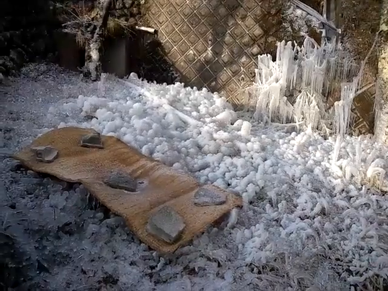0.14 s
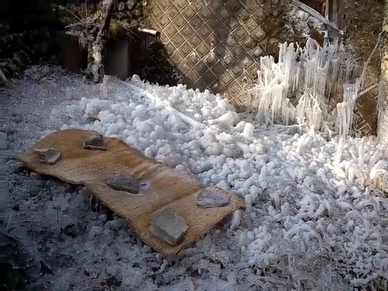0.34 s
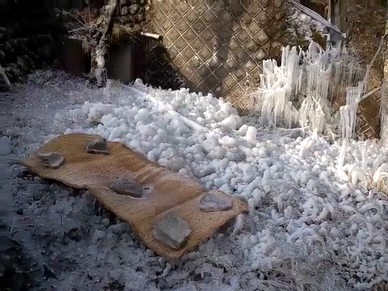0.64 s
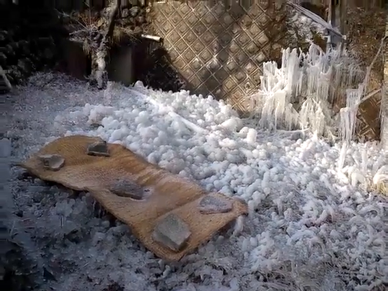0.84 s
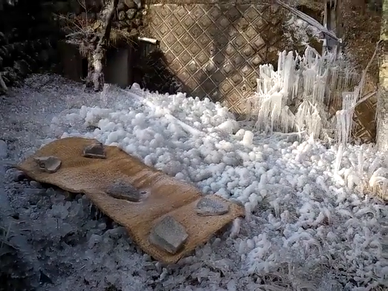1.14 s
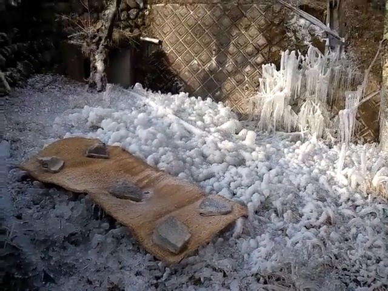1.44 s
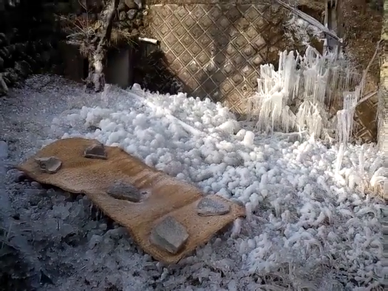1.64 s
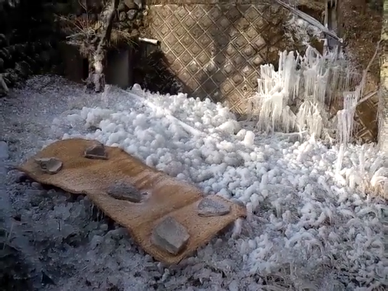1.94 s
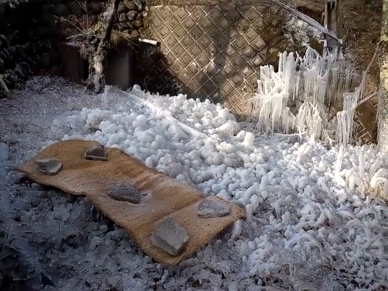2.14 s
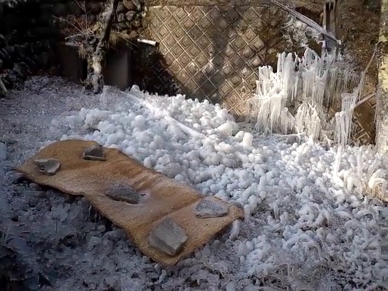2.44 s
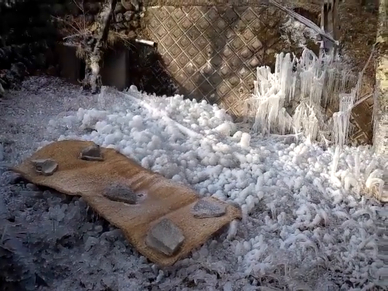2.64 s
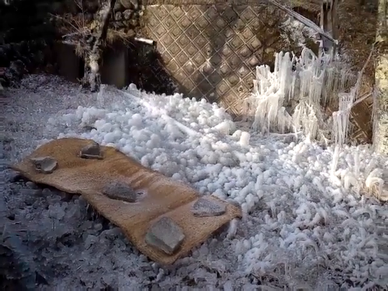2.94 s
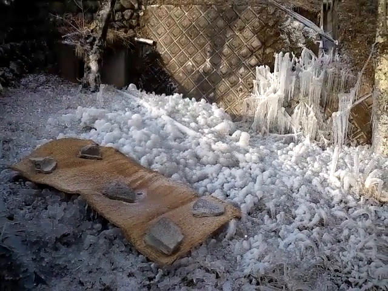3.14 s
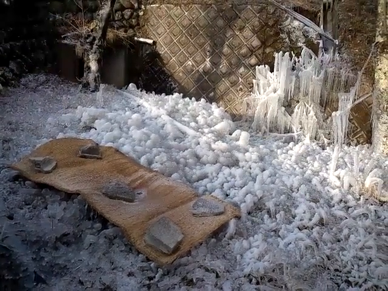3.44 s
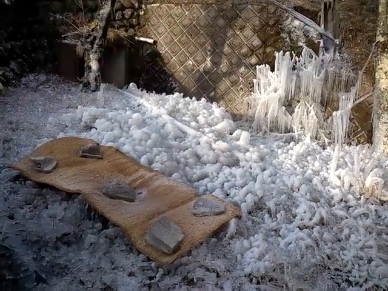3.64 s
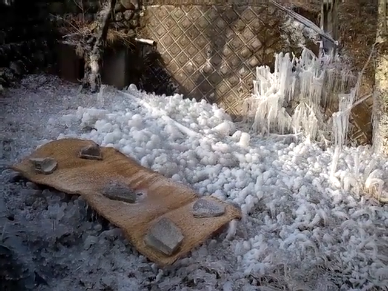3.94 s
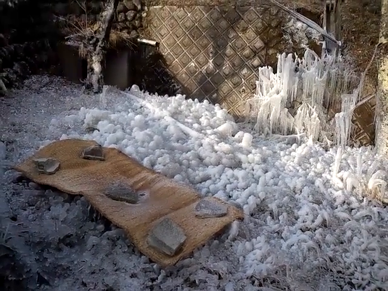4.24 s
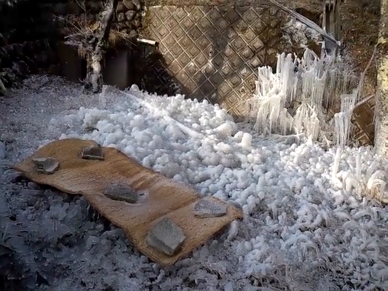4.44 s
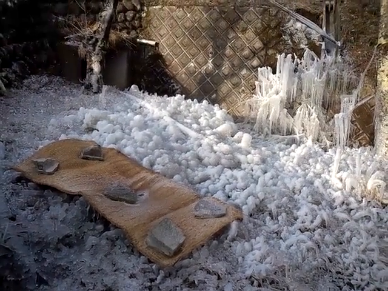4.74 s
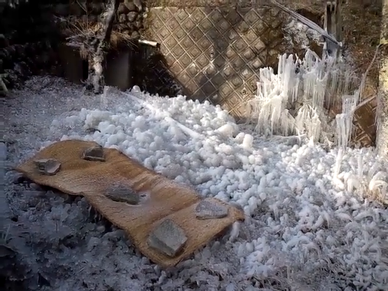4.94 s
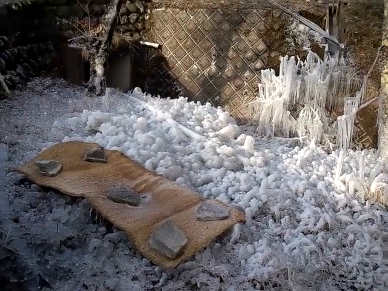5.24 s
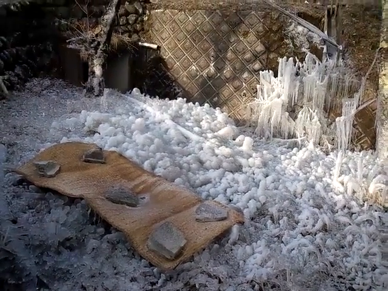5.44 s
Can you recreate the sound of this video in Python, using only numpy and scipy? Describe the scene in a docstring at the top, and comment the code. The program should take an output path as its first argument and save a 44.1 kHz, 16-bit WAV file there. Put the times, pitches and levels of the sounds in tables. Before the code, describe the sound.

A leaking pipe joint sprays water without pause: a thin, bright, shimmering hiss with fine drop ticks. A dull knock comes near the start, then several very faint taps; a sharper knock with a muffled scuffle falls near the middle. A gust rumbles later, followed by a thud, a hollow bump and a last dull knock. Quiet open yard, close dry microphone, no echo.

```python
"""Water under pressure sprays from a leaking pipe joint onto ice in a yard. The jet is turbulent noise,
coloured by the resonances of the gap and by narrow hollows; narrow streaks in the hiss fade out and return,
impulses tick where drops strike, and short tone bursts prickle near 8 kHz. Damped oscillators give a few near
knocks and a hollow bump; short muffled noise swells around them. One light gust rumbles on the microphone as
lumpy low noise, over the quiet air of the yard."""
import sys
import numpy as np
from scipy import signal
from scipy.fft import rfft, irfft
from scipy.io import wavfile
from scipy.ndimage import uniform_filter1d

SR = 44100
rng = np.random.default_rng(int(sys.argv[2]) if len(sys.argv) > 2 else 0)


def generate_wav(signal):
    """Clip the signal to [-1, 1] and save it as 16-bit WAV at the path in sys.argv[1]."""
    frames = np.transpose(np.atleast_2d(signal))
    scaled = np.clip(frames, -1, 1) * 32767
    pcm = np.round(scaled).astype(np.int16)
    wavfile.write(sys.argv[1], SR, pcm)


N = 246519
TIME = np.arange(N) / SR

# strength of the jet, followed by hiss and prickle: (t/s, relative level/dB)
JET_STRENGTH = [(0.0, -32), (0.35, -32), (1.35, -33), (1.53, -32), (1.75, -34), (1.98, -32), (2.25, -33.5),
                (2.47, -31.5), (2.75, -32), (3.08, -33), (3.3, -32), (4.05, -33), (4.4, -32.5), (4.65, -34),
                (4.78, -31.5), (5.0, -33), (5.5, -31)]


def gain_of(db):
    """Decibel law: amplitude gain is ten to the power dB / 20."""
    return 10 ** (np.asarray(db) / 20)


def evened(x):
    """Normalisation by the mean square: scales to rms 1."""
    return x / np.sqrt(np.mean(x ** 2) + 1e-20)


def read(points, hz):
    """Linear interpolation of a spectrum on a log-frequency axis."""
    f, value = np.transpose(points)
    return np.interp(np.log(hz + 1), np.log(f + 1), value)


def add(mix, s, sound):
    """Superposition: adds a sound to the mix from time s on."""
    part = mix[round(s * SR):][:len(sound)]
    part += sound[:len(part)]


def coloured(points):
    """Spectral shaping: steady white noise weighted by a spectrum, rms 1."""
    spectrum = rfft(rng.standard_normal(N))
    weight = gain_of(read(points, np.fft.rfftfreq(N, 1 / SR)))
    return evened(irfft(spectrum * weight, N))


def drift(shape, *spans):
    """Correlated noise: Gaussian smoothing over the given steps along each axis, rms 1."""
    z = np.fft.fftn(rng.standard_normal(shape))
    axes = np.ix_(*[np.fft.fftfreq(n) for n in shape])
    for f, span in zip(axes, spans):
        z = z * np.exp(-(np.pi * f * span) ** 2 / 2)
    return evened(np.fft.ifftn(z).real)


def bell(hz, centre, width):
    """Gaussian curve of height 1 with the given full width at half height."""
    return .5 ** ((2 * (hz - centre) / width) ** 2)


def turbulence(sputter_db=-1.25, sputter_s=0.0012, drops_per_s=260, drop_db=8, spread_db=1.5):
    """Jet break-up: a rush that sputters quickly, with random impulses where drops strike the ice."""
    rush = rng.standard_normal(N) * gain_of(sputter_db * drift((N,), sputter_s * SR))
    sizes = gain_of(drop_db + spread_db * np.minimum(rng.exponential(1, N), 4))
    signs = rng.choice([-1, 1], N)
    strikes = rng.random(N) < drops_per_s / SR
    return rush + sizes * signs * strikes


def flicker(hz, t, width_hz, hold_s):
    """Independent modulation by band: each strip of the spectrum wavers on its own, rms 1 overall."""
    strip = (hz / width_hz).astype(int)
    return drift((strip[-1] + 1, len(t)), 0, hold_s / t[1])[strip]


def shimmer(hz, t, hollow_db):
    """Random spectral fading: narrow streaks come and go, most often in the hollows."""
    # how readily streaks fade: (f/Hz, lean; 0 = half of the time, lower = more rarely)
    streaky = [(200, -2.5), (480, 0.05), (750, 0.15), (1100, 0.0), (1500, -1.0), (2500, -0.7), (3400, -.45),
               (4400, -0.15), (5200, -0.15), (5750, -0.5), (6500, 0.0), (7200, 0.05), (7900, -0.8)]
    # share of the flicker that comes in wide patches: (f/Hz, share 0-1)
    patchy = [(1150, 0.76), (1500, 0.01)]
    streak_depth_db, edge, hollow_lean_per_db = 45, .16, .085  # depth before the evening below

    streaks = flicker(hz, t, width_hz=52, hold_s=.11)
    patches = flicker(hz, t, width_hz=150, hold_s=.06)
    wide = np.clip(read(patchy, hz), 0, 1)[:, None]
    lean = read(streaky, hz)[:, None] - hollow_lean_per_db * hollow_db
    chance = np.sqrt(1 - wide) * streaks + np.sqrt(wide) * patches
    faded = .5 + .5 * np.tanh((chance + lean) / edge)
    power = gain_of(-streak_depth_db * faded) ** 2
    # as one streak fades, its neighbours take over
    power = power / (uniform_filter1d(power, size=71, axis=0) + 0.025)
    # over time the resonances keep their colour
    return np.sqrt(power / (power.mean(axis=1, keepdims=True) + 0.14))


def jet(size=4096):
    """Resonance: the gap colours turbulence, with narrow hollows in the hiss; both change in a shift."""
    # broad hiss of the spray: (f/Hz, relative density/dB)
    spray = [(400, -17.5), (700, -20), (1050, -15), (1350, -14), (2300, -10), (2900, -14.5), (3200, -9),
             (4400, -7.5), (6500, -7.0), (7300, -13.5), (8100, -22), (8500, -18), (8750, -36.5)]
    # resonances of gap and pipe: (f/Hz, width/Hz, relative level before shift/dB, after it/dB)
    resonances = [(1600, 79, -13.5, -9), (1940, 165, -13, -8.5), (2544, 238, -6.5, -2.5),
                  (2855, 110, -9, -7), (3287, 166, -6.0, -5.5), (3743, 310, -7, -7.5),
                  (3980, 110, -8.5, -7.5), (4300, 160, -5.0, -13), (4760, 200, -9, -10),
                  (4870, 71, -5.5, -2.5), (5127, 146, -2.5, -2.5), (5530, 220, -5.5, -15),
                  (5725, 136, -5, 0), (5914, 200, -5.5, -2.5), (6195, 75, -0.5, -10), (6680, 91, -7, -7),
                  (6877, 32, -6, -17), (7165, 97, -7.5, -4.5), (7460, 153, -3.5, -4), (7765, 240, -8, -8.5),
                  (7950, 34, -5.5, -9)]
    # narrow hollows in the hiss: (f/Hz, width/Hz, change before shift/dB, after it/dB)
    hollows = [(845, 82, -7.5, -6.5), (1123, 87, -17, -14), (2118, 37, -7.5, -10.5), (2390, 30, -23, 2),
               (3167, 148, -12, -8), (3792, 83, -7.5, -10.5), (3910, 214, -10, -9.5), (4300, 52, -1.5, 1),
               (4830, 55, -31.5, -19.5), (5354, 19, -2, -5), (5970, 89, -22.5, -3.5), (6006, 76, -4.5, -7),
               (6280, 68, -9, 0), (6450, 110, -5, -7), (6840, 47, -9, -18.5), (7130, 12, -8, -3),
               (7330, 92, -13, -26), (7670, 55, -5.5, 2.5)]
    # course of the treble, used about its mean: (t/s, level/dB)
    treble = [(0, -5.5), (2.8, -2), (3.1, -8), (5.2, -6), (5.449, 0)]
    # midway the jet shifts in the gap and its colour changes
    shift_s, shift_takes_s = 2.45, 0.23

    overlap = size - size // 4
    hz, t, z = signal.stft(turbulence(), SR, nperseg=size, noverlap=overlap)
    f = hz[:, None]
    level_db = np.interp(t, *np.transpose(JET_STRENGTH))
    top_db = np.interp(t, *np.transpose(treble))
    shifted = .5 + .5 * np.tanh((t - shift_s) / shift_takes_s)

    power = gain_of(read(spray, f)) ** 2
    power = power + sum(gain_of(a + (b - a) * shifted) ** 2 * bell(f, centre, width)
                        for centre, width, a, b in resonances)
    hollow_db = sum((a + (b - a) * shifted) * bell(f, centre, width)
                    for centre, width, a, b in hollows)
    treble_share = read([(6100, 0.22), (6800, 0.69)], f)
    tilt_db = treble_share * (top_db - top_db.mean())
    colour = np.sqrt(power) * gain_of(hollow_db + tilt_db) * shimmer(hz, t, hollow_db)
    colour = colour / np.linalg.norm(colour, axis=0)  # colour alone: the level follows the strength
    hiss = signal.istft(z * colour, SR, nperseg=size, noverlap=overlap)[1][:N]
    return evened(hiss) * gain_of(np.interp(TIME, t, level_db))


def prickle(count=12):
    """Random impulse excitation: short high tone bursts at random moments, a fine prickle near 8 kHz."""
    centre_hz, spread_hz, half_s = 7947, 120, 0.0016  # half length to 1/e
    bursts_per_s, size_spread_db, below_jet_db = 200, 1.5, -12

    t = np.arange(-256, 257) / SR
    sizes = gain_of(size_spread_db * np.minimum(rng.exponential(1, N), 4))
    impulses = sizes * (rng.random(N) < bursts_per_s / SR)
    kind, out = rng.integers(0, count, N), np.zeros(N)
    for k, hz in enumerate(centre_hz + spread_hz * np.linspace(-1, 1, count)):
        burst = np.exp(-(t / half_s) ** 2) * np.sin(2 * np.pi * hz * t)
        out += signal.oaconvolve(impulses * (kind == k), burst, "same")
    return evened(out) * gain_of(below_jet_db + np.interp(TIME, *np.transpose(JET_STRENGTH)))


def yard_air(level_db=-55.5):
    """Stationary ambient noise: the quiet air of the yard, mostly low."""
    # (f/Hz, relative density/dB)
    air_spectrum = [(20, 3.5), (60, -13.5), (120, -6.5), (180, 4.5), (300, 0), (400, -5.5), (500, -52.5),
                    (1200, -47.5)]
    return gain_of(level_db) * coloured(air_spectrum)


def wind(calm_db=-69, after_db=-54, lump_db=4.0, flutter_lump_db=3):
    """Turbulent pressure: a gust buffets the microphone, flutters and leaves the air a little restless."""
    # (f/Hz, relative density/dB)
    buffet = [(15, -11), (35, 5.5), (58, 11), (110, -1), (170, -6), (300, -24.5), (450, -46.5), (600, -57),
              (1500, -80)]
    # higher flutter near the height of the gust: (f/Hz, relative density/dB)
    flutter = [(50, -15), (110, 0), (190, 0), (280, -7), (380, -25), (560, -63)]
    # eddies that slap the microphone: (t/s, peak level/dB, f/Hz)
    eddies = [(3.371, -34, 75.6), (3.706, -31, 46), (3.793, -29.5, 74), (3.808, -30, 90), (3.99, -28.5, 58),
              (4.027, -26, 85), (4.0645, -25, 137), (4.132, -33, 66), (4.184, -25.5, 73.6),
              (4.271, -31, 88.5), (4.494, -32, 52), (4.571, -34, 111), (4.68, -30, 46.3)]
    gust_s, gust_peak_db, rise_db_per_s, fall_db_per_s = 4.12, -36, 15.5, 17.5
    flutter_s, flutter_half_s, flutter_db = 4.09, 0.1, -41
    contact_cycles, ring_cycles = 0.53, 1.7

    since = TIME - gust_s
    gust_db = gust_peak_db - np.maximum(-since * rise_db_per_s, since * fall_db_per_s)
    floor_db = np.where(since < 0, calm_db, after_db)
    lumpy = drift((N,), .02 * SR)
    rumble = evened(coloured(buffet) * gain_of(lump_db * lumpy))
    out = gain_of(np.maximum(gust_db, floor_db)) * rumble
    height = np.exp(-((TIME - flutter_s) / flutter_half_s) ** 2)
    out += gain_of(flutter_db) * height * evened(coloured(flutter) * gain_of(flutter_lump_db * lumpy))
    for s, peak_db, hz in eddies:
        add(out, s, knock(peak_db, contact_cycles / hz, hz, ring_cycles / hz))
    return out


def muffled_swells(grain_db=2.5, grain_s=0.0038):
    """Low-pass filtering and amplitude modulation: short, grainy, muffled noise swells around the knocks."""
    # (f/Hz, relative density/dB)
    swell_spectrum = [(40, -18), (110, 1), (200, 0), (480, -2), (780, -4), (1050, -10.5), (1400, -14),
                      (2500, -40), (5000, -61)]
    # (t of the loudest moment/s, level before muffling/dB, half length to 1/e/s, low-pass f/Hz)
    swells = [(0.303, -45, 0.025, 750), (0.357, -47, 0.033, 600), (2.779, -32.5, 0.017, 1800),
              (2.81, -30.5, 0.015, 2200), (2.834, -30.5, 0.015, 2200), (2.853, -31.5, 0.0055, 1800),
              (2.886, -38, 0.037, 750), (4.885, -35.5, 0.018, 700), (4.912, -28, 0.005, 900),
              (4.939, -39, 0.017, 800), (5.364, -39.5, 0.031, 1100), (5.545, -37, 0.023, 220)]
    noise = evened(coloured(swell_spectrum) * gain_of(grain_db * drift((N,), grain_s * SR)))
    out = np.zeros(N)
    for s, db, half_s, hz in swells:
        muffled = signal.lfilter(*signal.butter(2, hz, fs=SR), noise)
        out += gain_of(db) * np.exp(-((TIME - s) / half_s) ** 2) * muffled
    return out


def knock(peak_db, contact_s, hz, t60):
    """Forced damped oscillator: a soft push drives a body; a shorter contact sounds brighter."""
    t = np.arange(SR // 5) / SR
    push = np.sin(np.pi * np.minimum(t / contact_s, 1)) ** 2
    swing = np.sin(2 * np.pi * hz * t) * gain_of(-60 * t / t60)
    pressure = -np.gradient(signal.fftconvolve(push, swing)[:len(t)])
    return gain_of(peak_db) * pressure / abs(pressure).max()


def bump(level_db, rise_s=0.011, hz=174.7, t60=0.095):
    """Single-mode resonance: a hollow body swells into its one low note and dies away."""
    t = np.arange(SR // 5) / SR
    rise = np.minimum(t / rise_s, 1)
    decay = gain_of(-60 * t / t60)
    return -gain_of(level_db) * rise * decay * np.sin(2 * np.pi * hz * t)


def knocks():
    """Contact-time law: harder blows touch more briefly and sound brighter; a hollow bump joins them."""
    # dull knocks: (t/s, peak level/dB, f/Hz)
    blows = [(0.3255, -19, 112), (0.561, -34.5, 100), (0.791, -33, 112), (1.152, -32.5, 116),
             (1.225, -32, 121), (1.334, -36.5, 110), (1.414, -37, 120), (1.485, -34.5, 105),
             (2.688, -35, 81), (2.8097, -17, 300), (2.815, -13.5, 640), (2.8292, -25, 170),
             (2.8345, -23.5, 55), (2.8411, -29, 220), (2.8481, -21, 180), (2.8515, -34, 260),
             (4.9182, -14, 167), (5.447, -31.5, 90), (5.5808, -20, 186)]
    # hollow bump that rings on: (t/s, level before rise and decay/dB)
    bumps = [(5.3608, -13.5)]
    # contact is shortest from hard_db up and doubles for every doubling_db below it
    hard_db, hard_contact_s, doubling_db = -15, 0.0017, 9
    ring_cycles = 3  # swings until the body has decayed by 60 dB

    out = np.zeros(N)
    for s, peak_db, hz in blows:
        contact_s = hard_contact_s * 2 ** (max(hard_db - peak_db, 0) / doubling_db)
        add(out, s, knock(peak_db, contact_s, hz, ring_cycles / hz))
    for s, level_db in bumps:
        add(out, s, bump(level_db))
    return out


def scene():
    """Superposition of the leak, the yard's air, the near knocks, the muffled swells and the wind."""
    leak = gain_of(0.3) * jet() + prickle()
    return (leak + yard_air() + knocks() + muffled_swells() + wind())[None]


def record(dry):
    """Band limitation: a linear-phase low-pass removes everything well above its edge."""
    low_pass = signal.firwin(401, 8850, window=("kaiser", 9), fs=SR)  # edge in Hz
    return signal.oaconvolve(dry, low_pass[None], "same")


dry = scene()
out = record(dry)
generate_wav(out)
```